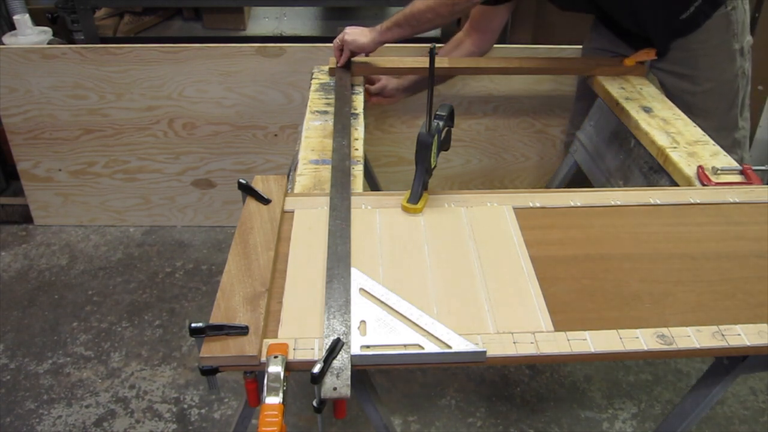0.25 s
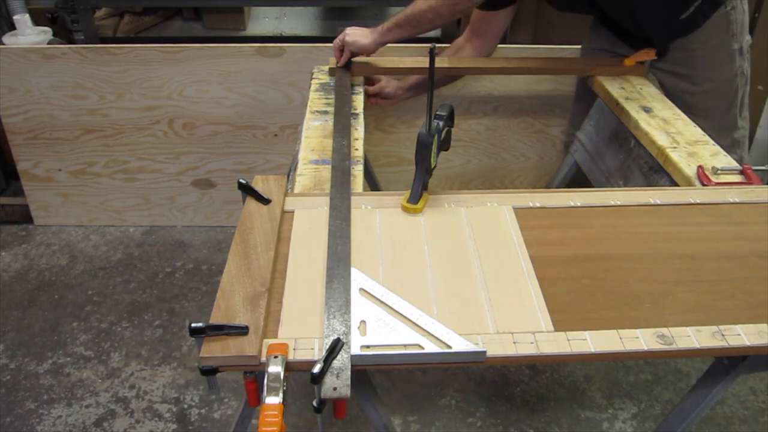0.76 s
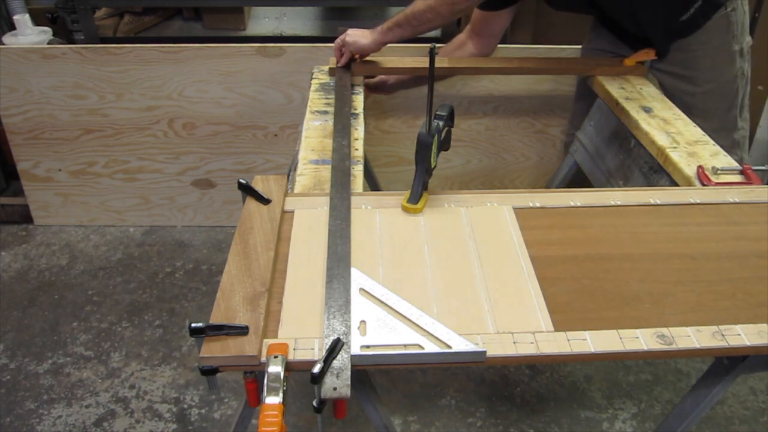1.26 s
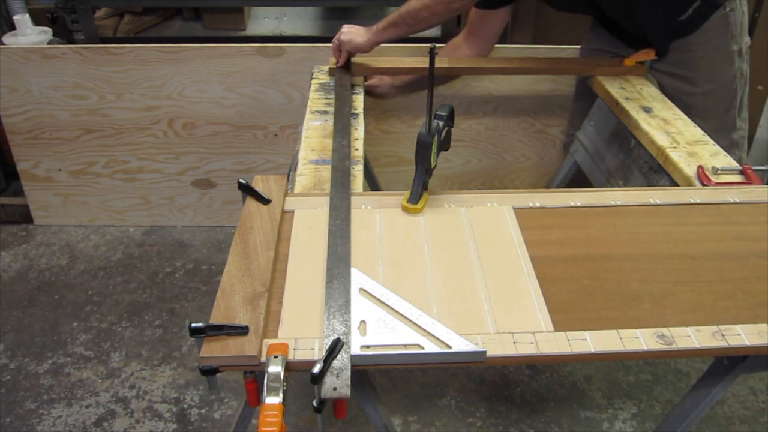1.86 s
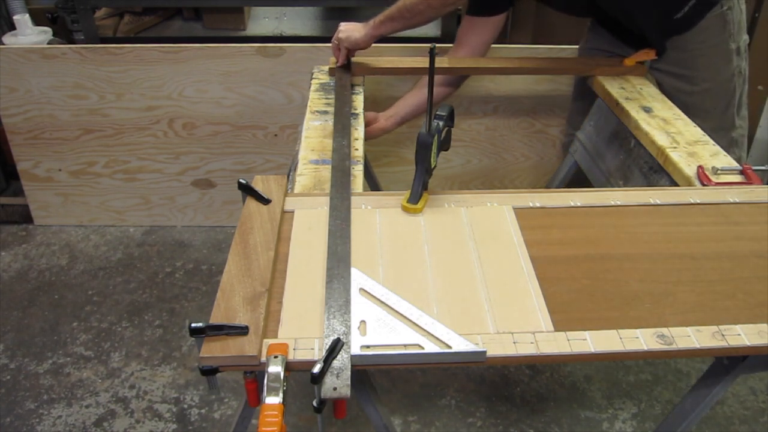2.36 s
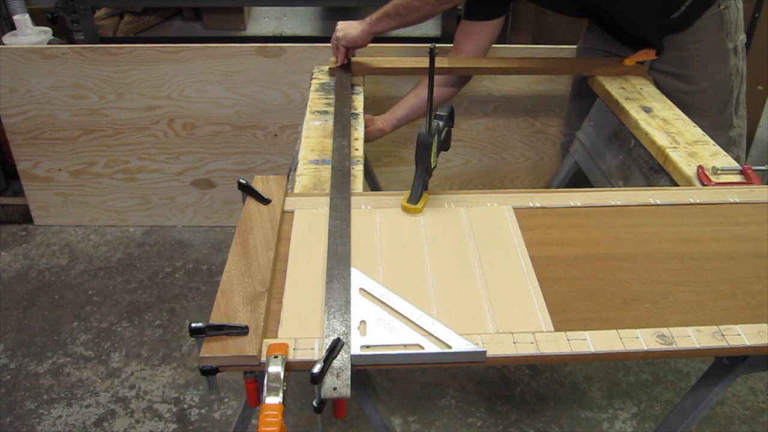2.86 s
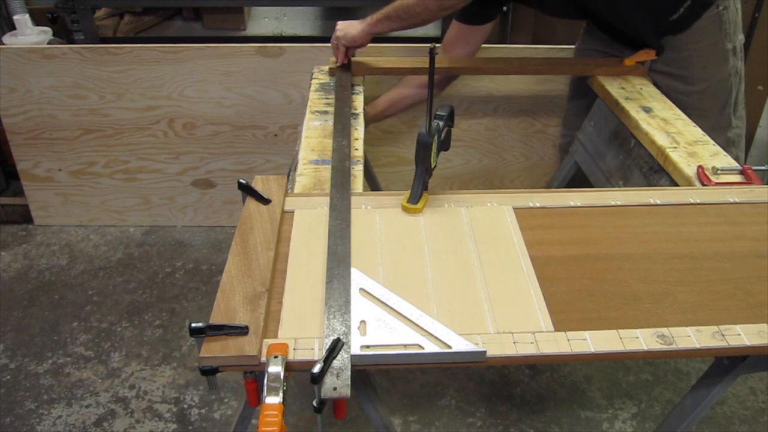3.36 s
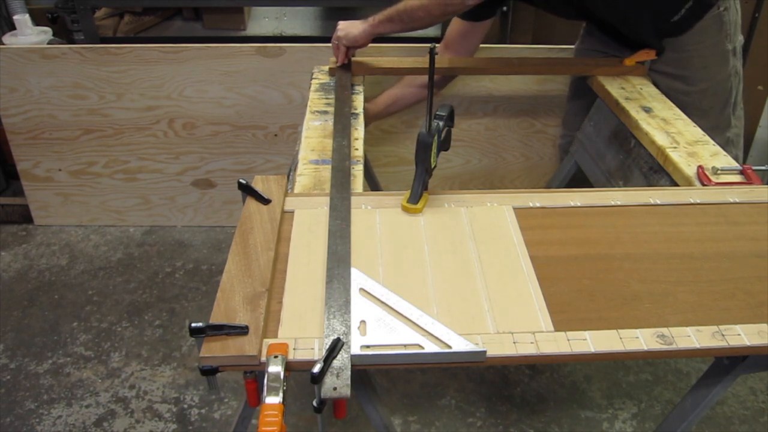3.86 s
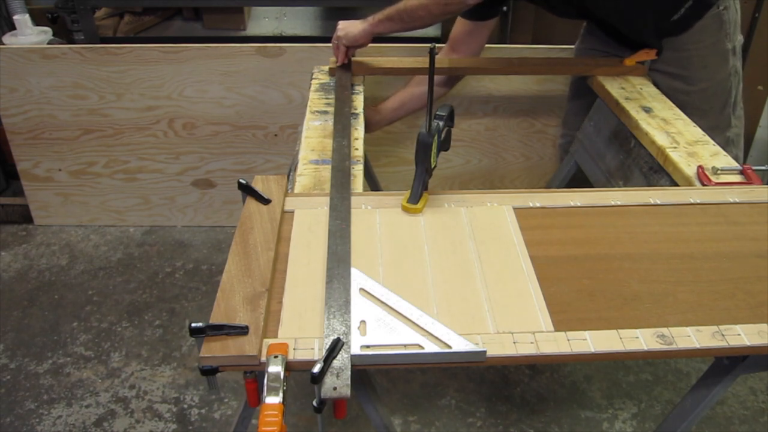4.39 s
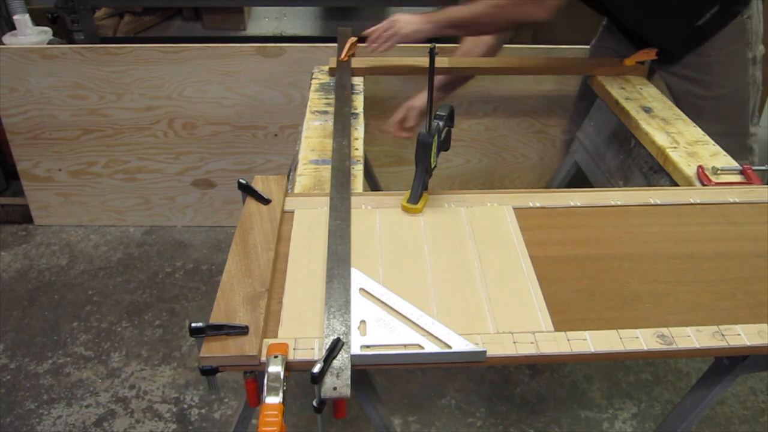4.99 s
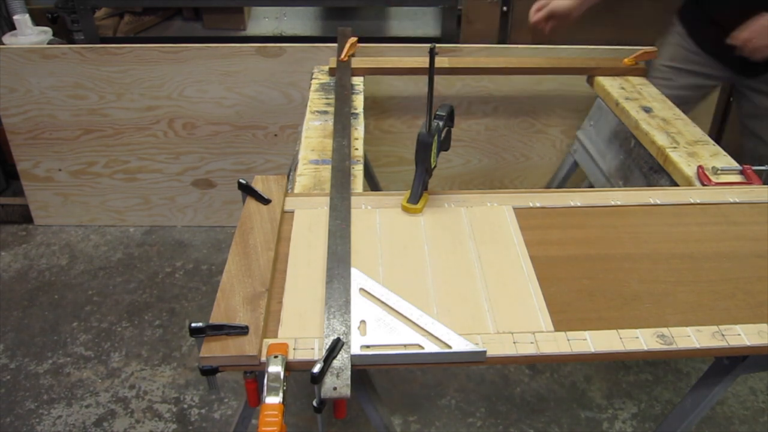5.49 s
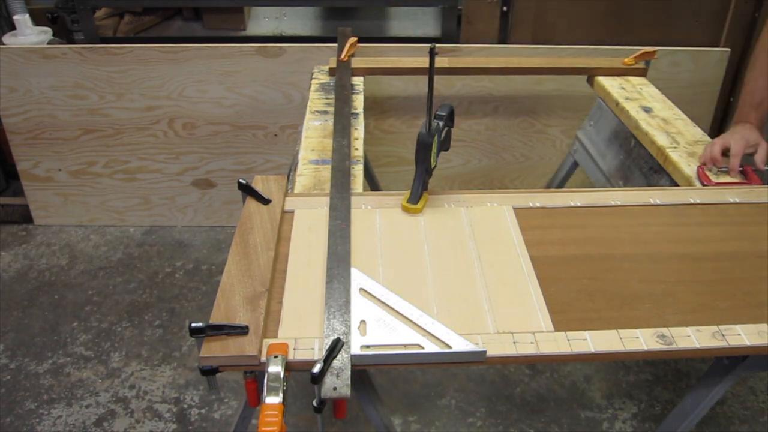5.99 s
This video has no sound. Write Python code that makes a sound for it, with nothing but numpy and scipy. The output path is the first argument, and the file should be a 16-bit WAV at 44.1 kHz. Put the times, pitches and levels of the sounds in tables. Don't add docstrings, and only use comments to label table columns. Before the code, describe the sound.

Irregular metal clacks and woody knocks echo briefly in a workshop over soft rubbing and low fan hum, ending with a hard hand-tool clatter.

```python
import sys
import numpy as np
from scipy import signal
from scipy.fft import rfft, irfft, next_fast_len
from scipy.io import wavfile
from scipy.ndimage import uniform_filter1d

SR = 44100
rng = np.random.default_rng(int(sys.argv[2]) if len(sys.argv) > 2 else 0)


def generate_wav(signal):
    frames = np.transpose(np.atleast_2d(signal))
    scaled = np.clip(frames, -1, 1) * 32767
    pcm = np.round(scaled).astype(np.int16)
    wavfile.write(sys.argv[1], SR, pcm)


def nominal_scale(level):
    x = np.asarray(level, float) / 20
    return 10 ** x


N = 275051

# (frequency [Hz], level [dB per Hz])
RUBBING_HISS = [(880, -70), (1500, -13), (1740, 9), (7450, -1.5), (8130, -18), (8540, -15), (9890, -7),
                (15500, -24.5)]


def evened(x):
    return x / np.sqrt(np.mean(x ** 2) + 1e-20)


def read(points, hz):
    f, value = np.transpose(points)
    return np.interp(np.log(hz + 1), np.log(f + 1), value)


def add(mix, s, sound):
    part = mix[..., round(s * SR):][..., :sound.shape[-1]]
    part += sound[..., :part.shape[-1]]


def colour(x, points):
    log_gain = np.log(nominal_scale(read(points, abs(np.fft.fftfreq(4096, 1 / SR)))))
    taps = np.fft.ifft(np.exp(signal.hilbert(log_gain).conj())).real[:2048]
    taps = taps.reshape((1,) * (x.ndim - 1) + (-1,))
    return signal.oaconvolve(x, taps, axes=-1)[..., :x.shape[-1]]


def diffuse(size, db_of, patchy_db, frame):
    # (frequency [Hz], likeness [-1 to 1])
    port_likeness = [(30., 1), (90., 0.2), (140., 0.77), (400., 0.93), (800., 0.835), (2000., 0.54),
                     (4000., -0.1), (15000., 0.12)]
    hop, bins = frame // 4, frame // 2 + 1
    hz = np.fft.rfftfreq(frame, 1 / SR)[:, None]
    t = np.arange(size // hop + 5) * hop / SR
    a, b, c, d, patches = rng.standard_normal((len(t), bins, 5)).T
    patches = uniform_filter1d(patches, size=10, axis=0)
    patches = evened(uniform_filter1d(patches, size=10, axis=1))
    same = np.clip(read(port_likeness, hz), -1, 1)
    mid, side = a + 1j * b, c + 1j * d
    left_right = np.array([1, -1])[:, None, None]
    z = np.sqrt(1 + same) * mid + left_right * np.sqrt(1 - same) * side
    z *= nominal_scale(db_of(hz, t) + patchy_db * patches)
    return signal.istft(z, nperseg=frame, noverlap=frame - hop)[1][:, :size]


def shop_air():
    # (frequency [Hz], level [dB per Hz])
    air_colour = [(15, -61), (25, -24), (70, -4.5), (160, -9), (352, -7), (403, -12.5), (5520, -29),
                  (15800, -50.5)]
    # (frequency [Hz], waver [Hz], level [dB])
    fan_tones = [(57.2, 11, -61), (141.7, 19, -65), (166.4, 2.2, -60.5), (193.3, 21, -49.5),
                 (231.5, 11, -52), (290, 2, -51.5), (357.6, 10, -56), (962, 17, -64.5)]
    air = diffuse(N, lambda hz, t: read(air_colour, hz), 0.99, frame=2048)
    above_rumble = signal.sosfilt(signal.butter(4, 400, "high", fs=SR, output="sos"), air)
    air *= nominal_scale(-54) / np.std(above_rumble)
    t, drift_hz = np.arange(N) / SR, np.fft.fftfreq(N, 1 / SR)
    for hz, waver_hz, db in fan_tones:
        spectrum = np.fft.fft(rng.standard_normal(N)) * np.exp(2j * np.pi * rng.random(N))
        waver = np.fft.ifft(spectrum / (1 + (2 * drift_hz / waver_hz) ** 2))
        tone = (1 + 0.5 * waver / np.std(waver)) * np.exp(2j * np.pi * hz * t)
        air += nominal_scale(db) * tone.real
    return air


def scuffs():
    # (start [s], press [s], ease [s], hiss level [dB], murmur level [dB])
    strokes = [(0., 0.0096, 0.0174, -92, -41), (.36, 0.057, 0.093, -85, -40),
               (.93, 0.027, 0.27, -100.5, -44), (1.199, 0.11, 0.078, -102, -48),
               (1.4, 0.12, 0.09, -82, -38.5), (2.5, 0.0134, 0.15, -91, -45), (3.44, 0.062, 0.106, -88, -83),
               (3.648, 0.05, 0.034, -65.5, -42), (3.771, 0.017, 0.16, -74, -43.5),
               (4.841, 0.017, 0.21, -73.5, -51.5), (5.3, 0.29, 0.45, -80.5, -67),
               (5.859, 0.107, 0.165, -71, -48)]
    # (frequency [Hz], level [dB per Hz])
    wood_murmur = [(250, -62), (264, -1), (563, 2), (626, -7.5), (933, -7), (1430, -10), (6000, -32.5),
                   (7800, -92.5)]
    out = np.zeros((2, N))
    hiss = evened(diffuse(N, lambda hz, t: read(RUBBING_HISS, hz), 0.33, frame=256))
    murmur = evened(diffuse(N, lambda hz, t: read(wood_murmur, hz), 1.0, frame=512))
    for start, press_s, ease_s, hiss_db, murmur_db in strokes:
        stroke_s = press_s + ease_s
        t = np.arange(0, stroke_s + 0.1, 1 / SR)
        at = round(start * SR) + np.arange(len(t))
        pressure = np.interp(t, [0, press_s, stroke_s], [0.68, 1, 0.28])
        sound = nominal_scale(hiss_db + 26.0) * pressure ** 1.7 * hiss[:, at]
        sound += nominal_scale(murmur_db) * pressure ** 0.59 * murmur[:, at]
        edge = np.minimum(t / 0.022, 1) * nominal_scale(-300 * np.maximum(t - stroke_s, 0))
        add(out, start, sound * edge)
    return out


def shop_tail():
    # (frequency [Hz], time [s])
    fade_times = [(120, 1), (320, 1), (840, 0.68), (2210, 0.51), (5820, 0.36)]
    size = 3 * SR // 4
    t = np.arange(size) / SR
    tail = diffuse(size, lambda hz, t: -60 * t / read(fade_times, hz), 0.4, frame=256)
    build_up = 1 - np.exp(-(t / 0.0073) ** 2)
    early_echoes = 1 + 0.28 * np.exp(-t / 0.04)
    tail *= build_up * early_echoes
    return tail / np.linalg.norm(tail[0])


def blow(crack, modes, db, contact_ms, ring_db):
    # (frequency [Hz], level [dB])
    port_difference = [(300., -41), (1000., -15), (2500., -6.5), (5000., -7), (15000., 0)]
    t = np.arange(SR // 5) / SR
    touch = np.exp(-t * 3000 / contact_ms) * (1 - np.exp(-t * 9000 / contact_ms))
    both, unlike = colour(rng.standard_normal((2, len(t))) * touch, crack)
    hz, width, peak_db = np.transpose(modes)[:, :, None]
    width = np.maximum(width, 16)
    start = rng.random((2, len(modes), 1))
    pair = np.sin(2 * np.pi * (hz * t + start[0]))
    pair += 0.14 * np.sin(2 * np.pi * ((hz + 1.234 * width) * t + start[1]))
    ring = (nominal_scale(peak_db) * width * np.exp(-np.pi * width * t) * pair).sum(axis=0)
    ring = nominal_scale(ring_db) * evened(ring * (1 - np.exp(-t * 6000 / contact_ms)))
    direct = evened(both) + ring
    pulse = evened(colour(signal.unit_impulse(len(t)), crack))
    spread = pulse + nominal_scale(-2.5) * ring * np.exp(-t / 0.026)
    difference = colour(evened(unlike), port_difference)
    loudest = np.sqrt(uniform_filter1d(direct ** 2, size=130).max())
    return nominal_scale(db - 7.5) / loudest * np.array([direct, difference, spread])


def knocks():
    # (time [s], peak level [dB], ring over crack [dB])
    rail = ([(120, -14), (552, -14.5), (1410, -19.5), (1950, -8.5), (7760, -33), (8420, -47),
             (12900, -40.5), (13700, -89)], [(410, 54, -2.5), (576, 13, -4), (1084, 88.5, -4),
             (1846, 36.5, -9), (1982.5, 39, -7), (2340, 110, -26), (2870, 63.5, -9), (3340, 125, -6),
             (3700, 200, -8.5), (2510, 100, -20), (12550, 50, -36), (15100, 50, -45)], (18.7, 2.9, -0.37),
             [(0.053, -15.5, 4), (0.066, -21, -2)])
    knuckle = ([(150, -15), (300, -2), (550, -8), (900, -2.5), (2000, -33), (8000, -79.5)], [(430, 65, 3.3),
                (554, 13.1, 2.8)], (28.8, 0.89, 0.), [(0.102, -21.5, 5.2), (0.205, -30.5, 3.4),
                (4.975, -41.5, 1.5), (5.04, -43, 1.5), (5.88, -41, 1.5), (5.42, -49, 1.5)])
    trestle = ([(70., -51), (140., -10), (240., -24), (420., -11), (900., -86.5)], [(142.7, 13, -5),
                (177, 13, -48)], (25, 1, 0.), [(0.199, -38.5, 2.3), (0.499, -40, 3.4), (0.759, -27.5, 18),
                (1.549, -36, 1.9), (1.929, -30, 2.6), (3.231, -35, 9), (5.42, -41, 2.7)])
    board = ([(120, -5), (200, 4), (260, -46), (346, 3.5), (1950, -5.5), (5610, -27), (8250, -48.5),
              (15500, -56)], [(345, 10.5, -1.5), (1107, 35, -7.5), (1825, 55, -3.5), (2024, 33, -10.5),
              (2360, 110, -10.5), (2800, 38, -13), (3480, 390, -6), (4000, 200, -20)], (35, 3.8, -.6),
              [(0.296, -21, 3.5), (0.316, -24.5, -4), (0.334, -27, -5), (0.389, -31, -21)])
    clamp_bar = ([(120, -18), (975, -9), (4570, -13), (7450, -19.5), (8250, -41.5), (9710, -23),
                  (12900, -35), (15500, -73)], [(550, 100, 4.5), (991, 38, 7.5), (1194, 54, 6.5),
                  (790, 34, 4), (1654, 41, 8), (2330, 77, 1.5), (2730, 77, -2), (3140, 85, -21),
                  (3550, 51, -15), (3920, 48, -7), (4510, 120, 0.5), (5050, 50, -13), (6084, 59, 0.5)],
                  (29, 4.3, 0.194), [(0.663, -19, 40), (0.667, -8.5, 1.7)])
    clamp_body = ([(150, -39), (350, 1), (560, -1), (800, -9), (1500, -46), (8000, -89)], [(551, 22, -2),
                   (576, 15, -3), (445, 61, -7)], (23.8, -7.5, 0.), [(0.665, -19, 7.1), (0.712, -29.5, 9.8),
                   (0.795, -24, 19), (0.955, -25.5, 9.1), (2.185, -18.5, 22), (2.202, -27, 12),
                   (2.228, -17, 8), (2.29, -31, 9.2), (0.985, -30.5, 16)])
    panel = ([(120, -34.5), (184, -19), (260, -51), (955, -7.5), (4760, -33), (8250, -53), (9130, -61),
              (15500, -63.5)], [(356, 13, 6.5), (560, 40, 2), (910, 93, -14), (1706, 40, -1.5)],
              (20, 2.9, 0.), [(0.779, -19, 2.6), (1.339, -30, 3.5), (1.366, -25.5, 15), (1.385, -32, 10)])
    ledge = ([(120, -39), (184, -24), (260, -18), (955, -15.5), (2000, -30.5), (4760, -41.5), (8250, -61),
              (15500, -69)], [(604, 39, -0.5), (715, 51, -17), (850, 24, 0), (965, 39, -2.5),
              (1280, 52, -10), (1721, 84, -8.5), (4680, 320, -26)], (15, 2.6, 0.), [(1.2955, -23, 3.6),
              (1.302, -21, 3.2), (1.318, -24, 5)])
    pin = ([(300, -30.5), (1000, -10), (2500, -13), (4000, -4.5), (6000, -7), (8000, -32), (15500, -45)],
            [(4100, 90, -4), (2600, 90, 0.5)], (11.6, 2, 0.), [(1.337, -43, 2), (1.4205, -50, 0)])
    jaw = ([(120, 13), (955, 15.5), (1300, -4), (1910, 11.5), (6600, -37), (8250, -75), (8770, -46),
            (15500, -45.5)], [(970, 20, -4), (1127, 24, -7), (1440, 31, -29), (1600, 25, -15),
            (1860, 28, -3.5), (2020, 88, -6), (2260, 32.5, -11), (2515, 34, -12), (3000, 48, -25.5),
            (3330, 400, -9), (4080, 60, -30)], (18, 6, -0.32), [(1.657, -22, 2.9)])
    straight_edge = ([(120, -16), (383, -5), (690, -3.5), (2240, -5.5), (2870, -7), (6870, -22.5),
                      (11000, -38), (15500, -53)], [(385, 25.4, -4.5), (860, 16, -4), (1244.6, 53, -7),
                      (1624, 30, -7.5), (2220, 137, -2.5), (2328, 130, -2), (2826, 140, 0), (3330, 180, -9),
                      (3680, 94, -25), (4670, 33, -3), (5660, 370, -8), (7900, 54, -17.5), (9350, 51, -23),
                      (10800, 130, -24)], (19, 5.2, -0.39), [(1.7398, -8, 1.2), (1.758, -22, 3.5),
                      (1.776, -23, 6.8), (1.788, -28, 3)])
    sliding_part = ([(120, -30), (200, -3), (1480, -4), (1710, -5), (7090, -50), (8050, -70), (9140, -50),
                     (15500, -60.5)], [(355, 30, -9), (1145, 71, -6), (1680, 56, -2.5), (1755, 89, -7),
                     (2280, 89, -6), (2860, 62, -11.5)], (10.6, 5.42, .1), [(2.023, -22.5, 0.5),
                     (2.48, -30, -6.5)])
    screw = ([(120, -28), (563, -10), (1690, -11), (5270, -20.5), (6870, -26.5), (8080, -49), (9510, -39),
              (15500, -58)], [(380, 24, -11), (552, 40, 0), (806, 70, -7), (1090, 45, -10),
              (1785, 25, -2.5), (2290, 158, -0.5), (2510, 120, -4), (3132, 95, -10.5), (3360, 64, -9.5),
              (5225, 110, -1.5), (9750, 35, -19.5)], (14.7, 5.9, -.2), [(2.184, -31, 10.7),
              (2.189, -15.5, 1.9), (2.203, -21, 4.2)])
    lever = ([(200, -22), (500, -22), (1000, -1.5), (2300, -1), (3500, -16), (5200, -15), (7800, -41.5),
              (15500, -56.5)], [(888, 26.7, -3), (1720, 36, -7), (2230.6, 75, 0), (2500, 80, -8),
              (5070, 73, -15)], (13, 5.1, -.2), [(2.327, -22.5, 4.2)])
    dull_thud = ([(200, -23), (306, 0), (347, -44), (784, 12.5), (1130, 1), (4000, -10.5), (5200, -38),
                  (8800, -120)], [(574, 106, -3), (778, 74, -3), (900, 95, -3.5), (1052, 330, -7)],
                  (63, 5.3, -.3), [(2.559, -32.5, 17), (4.094, -33, 7), (4.524, -35.5, 0),
                  (4.537, -45, 3.5), (4.739, -41, -1.5)])
    handle = ([(120, -40), (200, 2), (1510, -1.5), (1740, -2), (6470, -41.5), (8200, -58.5), (8980, -54),
               (15500, -56)], [(900, 36, -12), (1750, 87, -0.5), (2320, 150, -2), (2950, 130, -8)],
               (31, 5.6, -.2), [(2.757, -33, -16), (2.8, -26, -2.5)])
    small_tick = ([(1180, -55.5), (2000, -41), (4040, 11), (6690, 13.5), (8080, -6), (10600, 0),
                   (15500, -13)], [(10230, 4900, -10.)], (11, 3.3, .9), [(3.1178, -40.5, 0),
                   (5.7134, -46.5, -27), (5.9885, -27, -9)])
    clamp_pad = ([(120, -13), (200, -11), (1170, -7), (1950, -4), (6960, -31.5), (8200, -65.5), (9140, -55),
                  (15500, -71.5)], [(3280, 300, -4), (593.7, 42, -4.5), (986, 130, -6), (1730, 30, -4.5),
                  (1903, 22, -2.5), (2473, 72, -1), (2860, 34, -10)], (24, 5.15, 0.), [(3.147, -22, 2.9)])
    end_stop = ([(120, -66), (200, -16.5), (1210, -7), (2900, -13.5), (7620, -57), (8350, -64),
                 (8980, -53.5), (15500, -63.5)], [(1171, 50, 9.5), (1310, 55, -4), (376, 25, 6.5),
                 (590, 24, 0), (960, 71, 0), (1720, 120, 7), (2270, 75, 4), (2920, 40, 0)], (20, 0.87, .3),
                 [(3.2195, -23, -3), (3.225, -18, -0.5), (3.24, -21.5, 4), (3.262, -30, 9),
                 (3.305, -48, 10)])
    pawl = ([(240, -28), (400, -5), (595, -13), (1070, -8.5), (1880, 1.5), (6580, -13), (8150, -18),
             (15500, -34.5)], [(1915, 79, 2), (2240, 77, -4), (2770, 170, -6), (3360, 130, 0),
             (4850, 104, -7), (6032, 78, -10)], (19, 8.4, -.7), [(3.8871, -30.5, 1), (4.0367, -28.5, 0.5)])
    nut = ([(240, -24), (400, 1.5), (1280, -8.5), (1960, 2), (7210, -21), (8150, -44), (10900, -30),
            (15500, -57)], [(996.4, 36, 2), (1910, 54, 6), (2210, 83, 4), (3000, 100, -12)],
            (18.6, 5.3, 0.54), [(4.3445, -32.5, -0.5), (4.36, -41, 0), (5.6875, -43.5, -34)])
    catch = ([(240, -23), (900, -4), (1500, -6), (2400, -2), (3400, -11), (6500, -17.5), (8150, -24),
              (15500, -41)], [(1865, 75, 0), (2310, 66, -2), (3230, 150, -3), (4570, 140, -9)],
              (27, 5.6, -.3), [(4.4595, -34, -4), (4.478, -37, 3)])
    hand_tool = ([(120, -7.5), (1460, -3.5), (5170, -7), (7200, -13.5), (8100, -28), (9000, -23.5),
                  (13500, -25), (14500, -48)], [(349, 64, -10), (664, 36, -4), (1005, 180, 0),
                  (1079.4, 65, -11), (1700, 56, -9), (1784, 47, -0.5), (1930, 78, 2.5), (2130, 140, 4),
                  (2313, 100, -3), (2730, 64, -6), (3500, 43, -25), (12450, 60, -26), (4820, 180, -4),
                  (6466, 150, -11)], (7.6, 6.7, -2.8), [(5.9882, -7, 6), (5.994, -14.5, 9.4),
                  (6.0015, -19, 2), (6.011, -29, 1.8), (6.027, -22, 3)])
    struck_things = (rail, knuckle, trestle, board, clamp_bar, clamp_body, panel, ledge, pin, jaw,
                     straight_edge, sliding_part, screw, lever, dull_thud, handle, small_tick,
                     clamp_pad, end_stop, pawl, nut, catch, hand_tool)
    out = np.zeros((2, N))
    for crack, modes, (contact_ms, room_db, pan_db), blows in struck_things:
        tail = shop_tail()
        balance = nominal_scale([[pan_db / 2], [-pan_db / 2]])
        for s, db, ring_db in blows:
            direct, unlike, spread = blow(crack, modes, db, contact_ms, ring_db)
            add(out, s, (direct + [[1], [-1]] * unlike) * balance)
            add(out, s, nominal_scale(room_db) * signal.fftconvolve(spread[None], tail, axes=1))
    return signal.sosfilt(signal.butter(4, 105, "high", fs=SR, output="sos"), out)


def groan(start, length, hz, db, rasp_db):
    # (multiple of slip rate, level [dB])
    overtones = [(1, -6.5), (2, -31), (3, -25.5), (4, -46.5), (5, -24), (6, -43)]
    # (frequency [Hz], level [dB])
    rasping_parts = [(587, -2.5), (946, 0), (1730, -6), (2310, 1), (3260, -3), (4050, -3), (4440, -5),
                     (2770, -2), (1340, -11)]
    share = np.arange(0, length, 1 / SR) / length
    wobble = 1 + 0.0089 * evened(uniform_filter1d(rng.standard_normal(len(share)), size=300))
    turns = np.cumsum(hz * wobble) / SR
    slips = sum(nominal_scale(d) * np.sin(2 * np.pi * k * turns) for k, d in overtones)
    t = np.arange(SR // 40) / SR
    parts = sum(nominal_scale(d) * np.sin(2 * np.pi * f * t) for f, d in rasping_parts)
    parts = parts * np.exp(-np.pi * 49 * t)
    pushes = np.exp(-(turns % 1) / 0.081) * (0.094 + rng.standard_normal(len(share)))
    rasp = evened(np.convolve(pushes, parts)[:len(share)])
    rasp = rasp + nominal_scale(-12.5) * evened(colour(rng.standard_normal(len(share)), RUBBING_HISS))
    load_db = np.interp(share, [0, 0.5, 1], [-6, 0, -13.5])
    shaking = nominal_scale(db + load_db) * evened(slips)
    rasping = nominal_scale(rasp_db - 13 * share ** 2) * evened(rasp)
    near = np.array([shaking, rasping]) * signal.windows.tukey(len(share), 0.3)
    to_shop = (nominal_scale([[-12.0], [1.5]]) * near).sum(axis=0)
    out = np.zeros((2, N))
    add(out, start, near.sum(axis=0)[None] * nominal_scale(3.0))
    add(out, start, signal.fftconvolve(to_shop[None], shop_tail(), axes=1))
    return out


def scene():
    # (start [s], length [s], slip rate [Hz], top level [dB], rasp
    # level [dB])
    groans = [
        (0.322, 0.067, 345, -33.5, -75),
        (0.372, 0.11, 345, -34, -67),
        (0.421, 0.037, 345, -46, -62.5),
        (3.652, 0.14, 352.8, -32, -43),
    ]
    return shop_air() + scuffs() + knocks() + sum(groan(*row) for row in groans)


def top_cut(x):
    return signal.sosfilt(signal.butter(12, 16500, fs=SR, output="sos"), x)


def record(dry):
    # (frequency [Hz], gain [dB])
    band_gap = [(7000., 0.5), (7700., -4.5), (8100., -9.5), (8550., -16), (8750., 8), (9100., 3.5),
                (15300., 13), (16200., -40.5)]
    # (frequency [Hz], level [dB])
    treble_mask = [(6000., -90.), (7500., -61), (10000., -65), (13500., -57), (15000., -53.5)]
    size = next_fast_len(N + 4096)
    gap = nominal_scale(read(band_gap, np.fft.rfftfreq(size, 1 / SR)))
    heard = irfft(rfft(dry, size) * gap, size)
    hz, t, z = signal.stft(heard, SR, nperseg=1024, noverlap=768)
    loud = np.sqrt((abs(z) ** 2).sum(axis=(0, 1)))
    masked = np.minimum(loud, np.roll(loud, 3)) * nominal_scale(read(treble_mask, hz))[:, None]
    near = np.sqrt(uniform_filter1d(abs(z) ** 2, size=5, axis=1))
    kept = z * np.clip(2 * near / masked - 1, 0.03, 1)
    kept *= nominal_scale(-9.0 * np.outer(hz > 5200, t < 0.04))
    mix = signal.istft(kept, SR, nperseg=1024, noverlap=768)[1][:, :N]
    return top_cut(mix)


dry = scene()
out = record(dry)
generate_wav(out)
```